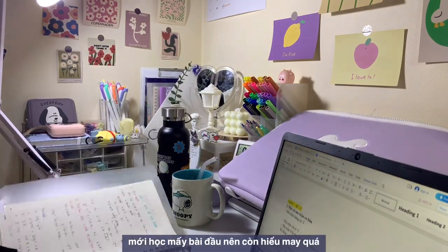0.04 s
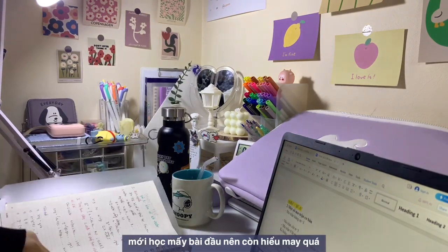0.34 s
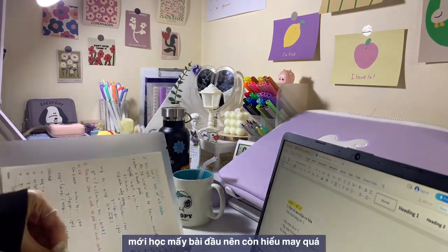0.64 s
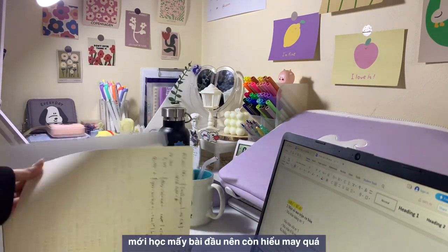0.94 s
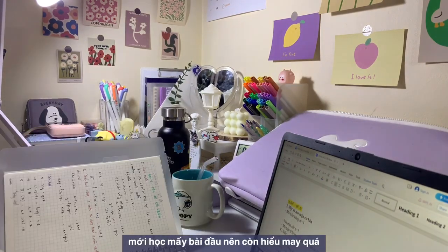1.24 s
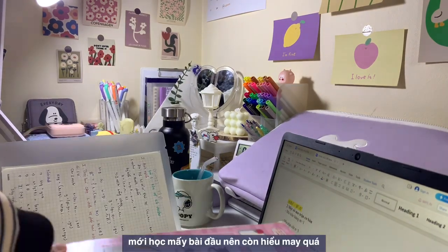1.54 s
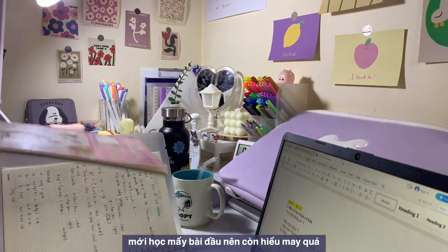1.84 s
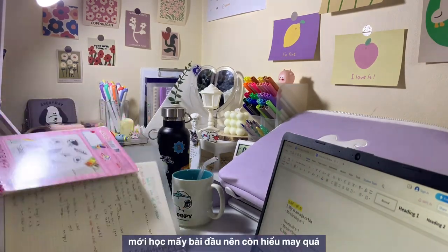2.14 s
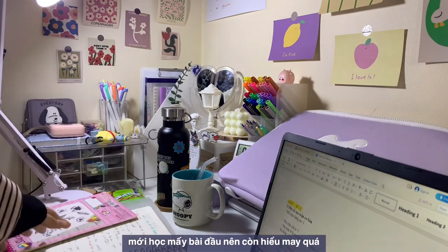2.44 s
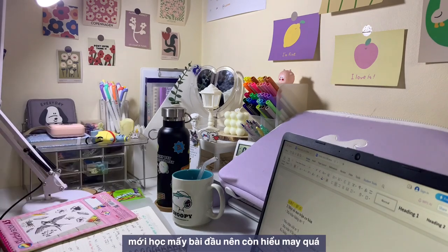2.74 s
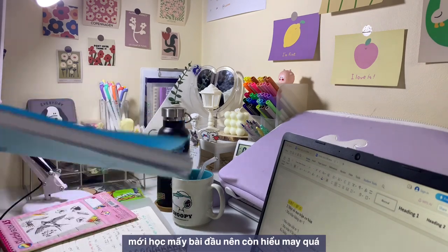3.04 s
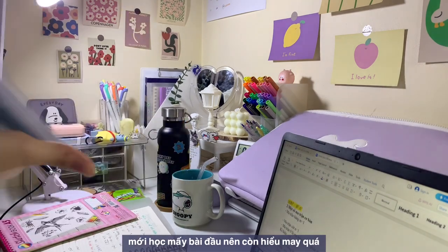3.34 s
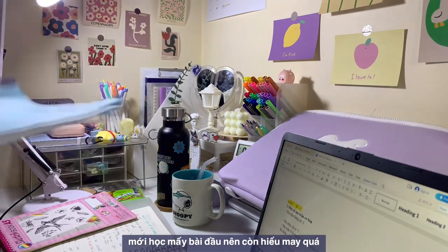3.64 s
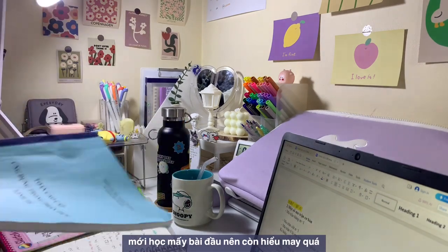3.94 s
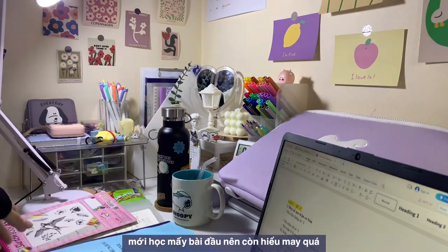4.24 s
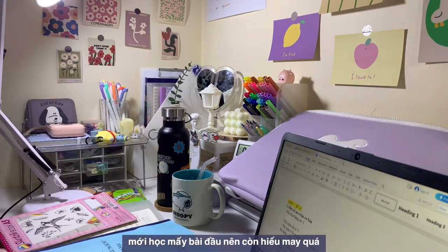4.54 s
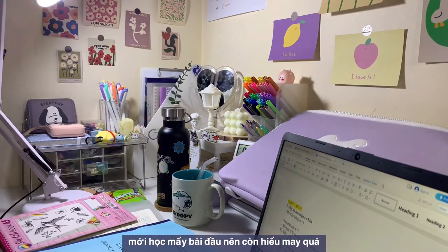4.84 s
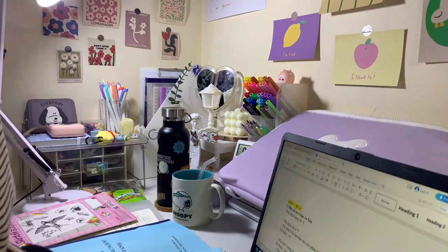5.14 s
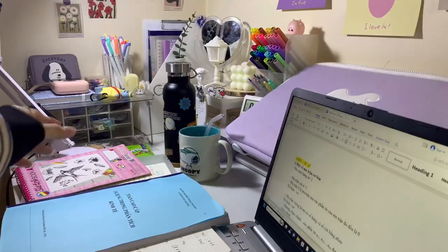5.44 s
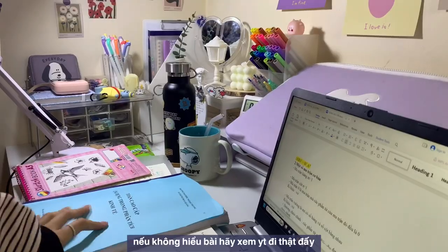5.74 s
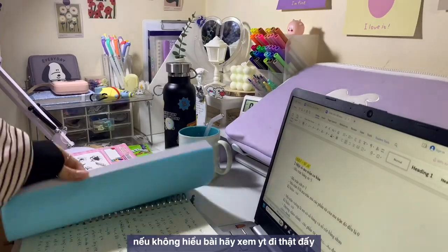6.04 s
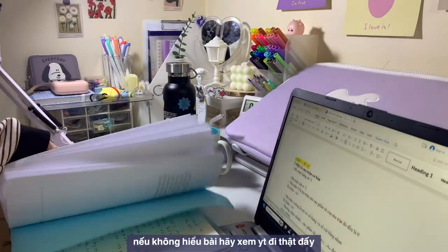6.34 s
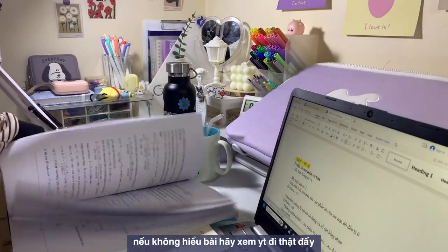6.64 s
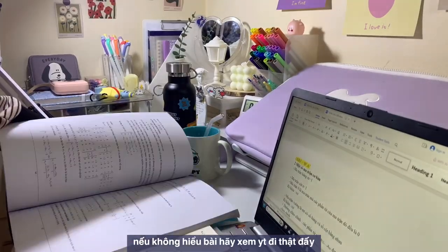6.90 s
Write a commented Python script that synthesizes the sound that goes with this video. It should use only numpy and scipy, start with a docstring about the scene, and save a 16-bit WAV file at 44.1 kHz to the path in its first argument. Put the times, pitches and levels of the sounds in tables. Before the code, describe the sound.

Paper rustles and slides, and books are set down on a desk with slaps and knocks, close by in a small room.

```python
"""Books drop on a pile on a desk, close to a phone: each impact drives out a slap of air and excites
the damped modes of the pile and the desk top. A page is turned, a hand lands on a cover, and stiff
pages buckle and snap as a workbook opens. In between, paper, sleeves and covers slide with the noise
of friction. The small room reverberates, over a low hum."""
import sys
import numpy as np
from scipy import signal
from scipy.fft import rfft, irfft, next_fast_len
from scipy.io import wavfile
from scipy.ndimage import uniform_filter1d, map_coordinates

SR = 44100
rng = np.random.default_rng(int(sys.argv[2]) if len(sys.argv) > 2 else 0)


def wav_out(sig):
    """Save sig, one row per channel (or a flat mono array), as 16-bit PCM at SR to the path in sys.argv[1]."""
    wavfile.write(sys.argv[1], SR, np.round(np.clip(np.atleast_2d(sig).T, -1, 1) * 32767).astype(np.int16))


N = 307377
LEAD_IN_S = .02  # a burst starts this long before its contact

# spectrum of cracking paper: frequency_hz, level_db
CRACK_SPECTRUM = [(500, -32.5), (1500, -15.5), (2500, 1.5), (4000, 0), (5800, 3.5), (8000, -6.5),
                  (11000, 0.5), (16000, -7.5)]


def amp(db):
    """Decibels to amplitude ratio."""
    return 10 ** (np.asarray(db) / 20)


def unit(x):
    """Normalisation to rms 1."""
    return x / np.sqrt(np.mean(x ** 2) + 1e-20)


def along(points, hz):
    """Interpolation of (frequency_hz, value) points on a logarithmic frequency axis."""
    knots_hz, values = np.transpose(points)
    return np.interp(np.log(hz + 1), np.log(knots_hz + 1), values)


def bell(hz, centre_hz, octaves):
    """A Gaussian peak of height 1 in log frequency."""
    return np.exp(-(np.log2(hz / centre_hz) / octaves) ** 2)


def wobble(rate_hz):
    """Smooth random modulation: a spline through rate_hz knots a second."""
    knots = rng.standard_normal(int(N * rate_hz / SR) + 4)
    return map_coordinates(knots, [np.arange(N) * rate_hz / SR])


def swell(peak_s, rise_s, fall_s, depth_db=19.5, shape=1.63):
    """Amplitude envelope, depth_db down at rise_s before its peak and fall_s after it."""
    t = np.arange(N) / SR - peak_s
    distance = np.abs(t / np.where(t < 0, rise_s, fall_s))
    return amp(-depth_db * np.minimum(distance, 10) ** shape)


def add(track, start_s, sound):
    """Superposition of a sound on a track."""
    start = round(start_s * SR)
    track[..., start:start + sound.shape[-1]] += sound[..., :N - start]


def filtered(x, response):
    """Linear filtering: the spectrum of x times a complex frequency response."""
    n = x.shape[-1]
    size = next_fast_len(n + SR // 10)
    return irfft(rfft(x, size) * response(np.fft.rfftfreq(size, 1 / SR)), size)[..., :n]


def coloured(x, spectrum, size=2048):
    """Minimum-phase filtering: folding the cepstrum makes the response causal."""
    cepstrum = irfft(np.log(amp(along(spectrum, np.fft.rfftfreq(size, 1 / SR)))))
    cepstrum[1:size // 2] *= 2
    cepstrum[size // 2 + 1:] = 0
    impulse_response = irfft(np.exp(rfft(cepstrum)))
    return signal.fftconvolve(x, impulse_response[None], axes=1)[:, :x.shape[1]]


def patchy(x, depth_db, bins=7, frames=16):
    """Spectral modulation: the colour drifts in patches of frequency and time."""
    spectra = signal.stft(x, nperseg=512)[2]
    field = uniform_filter1d(rng.standard_normal(spectra.shape[1:]), bins, 0)
    field = uniform_filter1d(field, frames, 1)
    return signal.istft(spectra * amp(depth_db * unit(field)), nperseg=512)[1][:, :x.shape[1]]


def scattered(pair):
    """Diffuse-field coherence: two independent signals become a stereo pair, alike in the bass."""
    # likeness of left and right: frequency_hz, correlation
    coherence = [(150, 0.94), (400, 0.72), (900, 0.29), (1800, 0.083), (3500, 0.054), (16000, 0.19)]
    angle = lambda hz: np.arccos(np.clip(along(coherence, hz), -1, 1)) / 2
    mid, side = filtered(pair, lambda hz: np.array([np.cos(angle(hz)), np.sin(angle(hz))]))
    return np.array([mid + side, mid - side])


def burst(length_s, spectrum, direct_share, lead_db, linger_db, linger_t60_s, grain_db):
    """Contact transient: a first brush, a pulse of grainy noise, a decay; energy of rms 1 for length_s."""
    t = np.arange(SR // 5) / SR - LEAD_IN_S
    rise = np.maximum(t, 0) / (0.4 * length_s)
    pulse = (rise * np.exp(1 - rise)) ** 2
    shiver = amp(linger_db - 60 * t / linger_t60_s) * (1 - np.exp(-rise * rise))
    brush = amp(lead_db) * np.exp(-np.abs(t) / (.5 * length_s))
    grains = amp(grain_db * unit(uniform_filter1d(rng.standard_normal(len(t)), size=12)))
    direct = np.sqrt(direct_share) * rng.standard_normal(len(t))
    diffuse = np.sqrt(1 - direct_share) * scattered(rng.standard_normal((2, len(t))))
    noise = (direct + diffuse) * (pulse + shiver + brush) * grains
    return unit(coloured(noise, spectrum)) * np.sqrt(length_s * SR / len(t))


def room_hum(drone_hz=226, drone_db=-57.5):
    """Ambient noise: a diffuse rumble, and a faint drone modulated in pitch and level."""
    # rumble of the room: frequency_hz, level_db
    rumble_spectrum = [(20, -18), (40, -22.5), (62, 9), (100, -1.5), (150, 4), (220, -3.5), (400, -10.5),
                       (700, -22.5), (1500, -43), (4000, -38.5), (9000, -39.5), (16000, -45)]
    # its slow rise and fall: time_s, level_db
    rumble_levels = [(0, -53.5), (1.502, -55), (2.8, -53), (3.899, -51.5), (4.8, -61), (5.45, -48),
                     (5.8, -54.5), (6.97, -52)]
    rumble = unit(coloured(scattered(rng.standard_normal((2, N))), rumble_spectrum))
    pitch_hz = drone_hz * (1 + .025 * wobble(2.5) + .012 * wobble(32))
    phase = 2 * np.pi * np.cumsum(pitch_hz) / SR
    drone = (np.sin(phase) + amp(-12) * np.sin(2 * phase)) * amp(drone_db + 4.0 * wobble(8))
    drone *= swell(peak_s=2.83, rise_s=3.8, fall_s=3.76)
    rumble_db = np.interp(np.arange(N) / SR, *np.transpose(rumble_levels)) + wobble(1.1)
    return rumble * amp(rumble_db) + drone


def reverberation(x, early_db=-0.5, early_t60_s=0.051):
    """Early reflections, then a diffuse exponential tail; each third of a second takes new paths."""
    # reverberation time of the room: frequency_hz, t60_s
    decay_times = [(100, 0.87), (400, 0.33), (1500, 0.36), (5000, 0.33), (10000, 0.47), (16000, 0.075)]
    # colour of the reflected sound: frequency_hz, gain_db
    colour = [(120, -10.0), (400, -1), (1200, -0.5), (6000, -1.0), (14000, -5.5)]
    block, predelay = SR // 3, SR // 300
    out = np.zeros((2, N))
    for start in range(0, N, block):
        hz, t, spectra = signal.stft(rng.standard_normal((2, SR // 2)), SR, nperseg=256)
        decay = amp(-60 * t / along(decay_times, hz)[:, None]) + amp(early_db - 60 * t / early_t60_s)
        tail = scattered(signal.istft(spectra * decay, SR, nperseg=256)[1])
        tail = np.pad(tail / np.linalg.norm(tail[0]), ((0, 0), (predelay, 0)))
        add(out, start / SR, signal.fftconvolve(x[:1, start:start + block], tail, axes=1))
    return filtered(out, lambda hz: amp(along(colour, hz)))


def cover_rubbing(slip_rate_hz=140, unevenness=0.85, slip_spread_db=4, slip_decay_s=0.0024):
    """Stick-slip friction: fingers and desk drag on a stiff cover and excite its hollow resonances."""
    # resonances of the held cover: centre_hz, width_hz, gain_db
    resonances = [(870, 400, -0.5), (1226, 81, 9.5)]
    # rubbing movements: peak_s, rise_s, fall_s, level_db
    rubs = [(3.13, 0.16, 0.071, -59), (3.37, 0.18, 0.089, -57.5), (3.651, 0.22, 0.35, -59.5),
            (5.0, 0.12, 0.13, -64.5), (5.258, 0.17, .012, -52.5)]
    gap, size = rng.standard_normal((1500, 2)).T
    onsets = (np.cumsum(np.exp(unevenness * gap)) * SR / slip_rate_hz).astype(int)
    slips = np.bincount(onsets[onsets < N], amp(slip_spread_db * size[onsets < N]), N)
    envelope = signal.lfilter([1], [1, -np.exp(-1 / (slip_decay_s * SR))], slips)
    grit = scattered(envelope * rng.standard_normal((2, N)))
    cover = lambda hz: sum(amp(db) * 1j * hz * width / (centre ** 2 - hz ** 2 + 1j * hz * width)
                           for centre, width, db in resonances)
    sound = unit(filtered(grit, lambda hz: cover(hz) / (1 + (hz / 2200) ** 4)))
    return sound * sum(amp(db) * swell(*timing) for *timing, db in rubs)


def stroke_levels(rest_scrape_db=-75.5, rest_hiss_db=-78):
    """Incoherent sources add in power: scrape level, hiss level and power-weighted brightness, in dB."""
    # slides of paper and sleeves: peak_s, rise_s, fall_s, scrape_db, hiss_db, brightness_db
    strokes = [(0.005, .02, .08, -64, -49, 0), (0.231, 0.1, 0.12, -71, -57.5, -7.5),
               (.39, 0.09, 0.042, -60, -46, 3), (.565, .13, 0.079, -52.5, -47, -1),
               (.655, 0.034, .14, -60.5, -50, 1.5), (0.827, .06, 0.052, -49, -40.5, 0.5),
               (.903, 0.09, .13, -36.5, -42.5, 1), (1.055, 0.063, 0.058, -40, -43.5, -7),
               (1.309, 0.091, 0.069, -55, -54.5, -4), (1.53, 0.07, 0.048, -96, -66, 12.5),
               (1.68, 0.12, 0.3, -64.5, -65, 3.5), (2.35, .2, 0.11, -39.5, -47, -6.5),
               (2.611, 0.091, 0.2, -52.5, -53, -8), (2.73, 0.14, 0.22, -59, -52.5, -2),
               (3.06, 0.2, 0.18, -61, -59.5, 1.5), (3.32, 0.49, 0.34, -58, -53.5, 6),
               (3.55, 0.15, 0.18, -58.5, -55, 2), (3.719, .12, 0.19, -58, -54.5, 5.5),
               (3.97, 0.094, 0.083, -60.5, -53.5, 5), (4.5, 0.12, 0.14, -65, -61, 8),
               (4.88, 0.32, 0.28, -69, -62, 4.5), (5.255, 0.21, 0.0063, -52.5, -50, 2),
               (5.519, 0.13, .26, -85, -55, 7.5), (5.85, 0.24, 0.15, -51, -60, 2.5),
               (5.907, 0.026, .04, -46, -37.5, 11), (5.95, 0.11, 0.35, -48, -53.5, 5),
               (6.222, 0.059, 0.063, -50.5, -44, -4.5), (6.325, 0.038, 0.04, -59, -46.5, 2.5),
               (6.44, 0.17, 0.48, -42.5, -47, -4), (6.66, 0.092, .21, -45.5, -44, -11.5)]
    peak_s, rise_s, fall_s, scrape_db, hiss_db, bright_db = np.transpose(strokes)
    power = np.array([swell(*timing) for timing in zip(peak_s, rise_s, fall_s)]) ** 2
    scrape = amp(scrape_db) ** 2 @ power + amp(rest_scrape_db) ** 2
    hiss = amp(hiss_db) ** 2 @ power + amp(rest_hiss_db) ** 2
    brightness_db = (bright_db * amp(hiss_db) ** 2) @ power / hiss
    return 10 * np.log10(scrape), 10 * np.log10(hiss), brightness_db


def friction(spectrum, grain_db, grain_rate_hz, patchy_db):
    """Friction noise: fibres catch and slip in uneven grains, coloured by the flexing sheet."""
    grains = amp(grain_db * wobble(grain_rate_hz)) * rng.standard_normal((2, N))
    return unit(patchy(coloured(scattered(grains), spectrum), patchy_db))


def crackle(rate_hz, spread_db):
    """Shot noise: tiny creases give way at random moments, most of them faintly; rms 1."""
    when, size = rng.random((int(rate_hz * N / SR), 2)).T
    ticks = np.bincount((when * N).astype(int), amp(spread_db * size ** 3), N)
    crease = rng.standard_normal((2, 128)) * amp(-60 * np.arange(128) / 128)
    creases = signal.fftconvolve(ticks[None], crease, axes=1)[:, :N]
    return unit(coloured(creases, CRACK_SPECTRUM))


def paper_sliding(treble_hz=6000):
    """Sliding friction: sheets scrape and hiss under an unsteady hand, and crackle as they flex."""
    # low scrape of the sheets: frequency_hz, level_db
    scrape_spectrum = [(50, -34.5), (110, 4.5), (280, 3.5), (480, 1), (620, 0), (860, 1), (1020, 0.5),
                       (1250, -1), (1600, -4), (2200, -9), (3500, -12), (8000, -64.5)]
    # high hiss of the sheets: frequency_hz, level_db
    hiss_spectrum = [(600, -41.5), (1900, -1.5), (2700, -0.5), (3600, 0.5), (4200, -0.5), (6000, -1),
                     (8500, -4), (11500, -3.5), (15500, -4.5)]
    scrape_db, hiss_db, bright_db = stroke_levels()
    hand_db = 1.1 * wobble(35)
    scrape = friction(scrape_spectrum, grain_db=3, grain_rate_hz=150, patchy_db=3.5)
    creases = crackle(rate_hz=100, spread_db=15) * amp(scrape_db - 16)
    hiss = friction(hiss_spectrum, grain_db=-1.5, grain_rate_hz=1200, patchy_db=2.5)
    treble = filtered(hiss, lambda hz: hz ** 4 / (hz ** 4 + treble_hz ** 4))
    hiss = (hiss - treble + amp(bright_db) * treble) / np.sqrt((1 + amp(bright_db) ** 2) / 2)
    return scrape * amp(scrape_db + hand_db) + creases + hiss * amp(hiss_db + hand_db)


def page_snaps(bend_delay_s=.0006, edge_db=7, edge_octaves=0.19):
    """Buckling: a sheet cracks at the pitch of its edge; a slower bending wave follows as a pop."""
    # edges that flick, buckle or touch down: start_s, length_s, crack_db, pop_db, pop_hz, edge_hz
    snaps = [(.216, .014, -36.5, -50, 2270, 3730), (0.321, 0.017, -60, -52, 490, 11400),
             (0.587, 0.0026, -44, -45, 1510, 11600), (.839, .003, -38, -38.5, 1210, 14800),
             (0.885, .006, -37, -30.5, 597, 2980), (0.9083, 0.0076, -36, -33, 880, 11500),
             (0.964, 0.01, -41.5, -34, 570, 5000), (.992, .004, -42.5, -34.5, 793, 3000),
             (1.038, 0.0047, -37.5, -36.5, 920, 11600), (1.064, .0082, -44, -33, 560, 11600),
             (1.2805, 0.0031, -33.5, -33.5, 1070, 3100), (1.354, .004, -46, -41.5, 1380, 7200),
             (1.387, 0.004, -48, -50, 1510, 5000), (1.767, 0.0039, -52, -55, 1650, 3920),
             (2.115, .0044, -42, -31.5, 1050, 3000), (2.129, 0.0038, -31, -27.5, 810, 2880),
             (2.2263, 0.0055, -33.5, -26.5, 710, 5950), (2.258, 0.0033, -30, -31, 1400, 7100),
             (2.286, 0.0031, -37, -26.5, 1030, 3000), (2.328, 0.0076, -27.5, -28.5, 634, 3000),
             (2.348, 0.0046, -16, -12, 714, 5900), (3.121, 0.0081, -58, -46.5, 860, 3000),
             (3.7, 0.0029, -44, -40, 960, 3030), (4.059, 0.0058, -68, -51, 1250, 3000),
             (4.1822, 0.0037, -25, -14, 980, 11500), (4.187, 0.0053, -29.5, -17, 610, 3000),
             (4.336, .007, -39, -41.5, 1210, 3900), (4.356, 0.007, -48, -40, 1090, 5930),
             (4.538, 0.0027, -42, -40.5, 1730, 8900), (4.953, .0043, -51.5, -52, 1740, 2970),
             (5.019, 0.025, -77, -56.5, 906, 9000), (5.118, 0.0078, -48, -50, 797, 9270),
             (5.6358, .007, -28.5, -22.5, 1050, 3030), (5.808, 0.0067, -54, -39, 580, 3000),
             (6.0292, .0035, -58, -36, 1640, 3080), (6.104, 0.0032, -44, -43, 1100, 11500),
             (6.357, 0.0028, -36.5, -38, 1440, 14560), (6.418, 0.0066, -37, -29.5, 1080, 2970),
             (6.451, 0.0072, -50, -35.5, 1750, 3020), (6.5321, 0.002, -16, -19.5, 1240, 8300),
             (6.611, .0033, -14, -22, 2260, 8500), (6.6982, .0022, -15.5, -18, 1710, 7200),
             (6.812, 0.0064, -36, -34.5, 960, 4000), (6.904, 0.003, -60, -37, 755, 3000)]
    # spectrum of the pop: multiple_of_pitch, level_db
    pop_shape = [(.1, -27.5), (.3, -3.5), (.6, -3.5), (1, -2), (1.5, -9), (2.4, -13), (4, -29), (9, -45.5)]
    out = np.zeros((2, N))
    hz = np.geomspace(400, 16000, 64)
    for start_s, length_s, crack_db, pop_db, pop_hz, edge_hz in snaps:
        edge_spectrum = np.c_[hz, along(CRACK_SPECTRUM, hz) + edge_db * bell(hz, edge_hz, edge_octaves)]
        pop_spectrum = [(multiple * pop_hz, db) for multiple, db in pop_shape]
        crack = burst(length_s, edge_spectrum, direct_share=0.45, lead_db=-15,
                      linger_db=-20, linger_t60_s=0.041, grain_db=3.5)
        pop = burst(length_s, pop_spectrum, direct_share=0.94, lead_db=-15,
                    linger_db=-17, linger_t60_s=.04, grain_db=1.5)
        add(out, start_s - LEAD_IN_S, amp(crack_db) * crack)
        add(out, start_s - LEAD_IN_S + bend_delay_s, amp(pop_db) * pop)
    return out


def ring(modes, attack_s, scatter_db):
    """Free vibration: damped modes at new strengths for each blow, rms 1 over the first 50 ms."""
    t = np.arange(SR) / SR
    hz, db, t60_s = np.transpose(modes)[:, :, None]
    struck_db = db + scatter_db * rng.standard_normal(hz.shape)
    tones = amp(struck_db - 60 * t / t60_s) * np.sin(2 * np.pi * hz * t)
    sound = tones.sum(0) * (1 - np.exp(-t / attack_s))
    return sound / sound[:SR // 20].std()


def book_impacts(favour_db=7, favour_octaves=0.09):
    """Impact excitation: air slaps out from under a landing book; the pile knocks, the desk top booms."""
    # pages, books and hands landing: start_s, contact_s, desk_db, boom_hz, pile_db, slap_db
    impacts = [(.882, .02, -40.5, 138, -43.5, -39.5), (.992, .01, -36, 99, -45, -44.5),
               (1.049, 0.02, -55.5, 150, -59, -43), (1.286, .013, -41.5, 115, -51.5, -55),
               (2.126, 0.008, -36, 149.7, -46.5, -33), (2.23, .0078, -35.5, 102, -55.5, -34),
               (2.335, .012, -40, 105.5, -35.5, -31), (2.349, .0087, -30.5, 136.7, -19.5, -18.5),
               (4.17, 0.03, -35.5, 205, -43.5, -24.5), (4.191, 0.0055, -34, 228.7, -18, -11.5),
               (4.202, 0.006, -18.5, 133, -33, -14.5), (4.228, .043, -27, 141.5, -40.5, -30),
               (5.64, .021, -30, 134.4, -46, -32.5), (5.814, .0088, -53.5, 102, -49.5, -52.5),
               (5.858, .01, -42.5, 146, -47, -42), (6.391, 0.036, -38, 108.4, -72, -48),
               (6.494, .023, -45, 123, -68, -52), (6.611, .011, -43.5, 139, -50, -36),
               (6.702, 0.0066, -53, 150, -69, -36.5)]
    # modes of the desk top: pitch_hz, level_db, t60_s
    desk_modes = [(65.7, -33.5, 0.4), (99, -9, 0.65), (120, -6, .18), (124.8, -3, 0.11), (133.1, -1, 0.23),
                  (146.75, -13, 0.55), (154.1, -7.5, .42), (188.8, -9, 0.08), (208.6, -6.5, 0.35),
                  (226.7, -8.5, .22), (261.5, -16, 0.2), (278, -19, 0.33)]
    # modes of the pile of books: pitch_hz, level_db, t60_s
    pile_modes = [(377, -17, 0.04), (406, 6.5, 0.13), (427, 1.5, 0.1), (463, -3, 0.15), (532.5, -0.5, 0.1),
                  (605, -18.5, 0.054), (677, -8.5, 0.12), (785, -19, 0.26), (825, -4, 0.13),
                  (871, -21, 0.2), (1030, -23, 0.1), (1280, -15.5, 0.14), (1420, -15.5, .13)]
    # expelled air: frequency_hz, level_db
    slap_spectrum = [(80, -32), (200, -1), (430, -9), (620, -1), (800, -1.5), (1050, -1.5), (1600, -11.5),
                     (3000, -15), (6000, -21.5), (10000, -27), (16000, -29.5)]
    out = np.zeros((2, N))
    for start_s, contact_s, desk_db, boom_hz, pile_db, slap_db in impacts:
        # the spot that is struck favours the desk modes near one pitch
        struck_modes = [(hz, db + favour_db * bell(hz, boom_hz, favour_octaves), t60_s)
                        for hz, db, t60_s in desk_modes]
        slap = burst(contact_s, slap_spectrum, direct_share=0.33, lead_db=-26,
                     linger_db=-6.5, linger_t60_s=0.096, grain_db=1.5)
        add(out, start_s - LEAD_IN_S, amp(slap_db) * slap)
        add(out, start_s, amp(pile_db) * ring(pile_modes, attack_s=0.0024, scatter_db=1.0))
        add(out, start_s, amp(desk_db) * ring(struck_modes, attack_s=0.012, scatter_db=4.0))
    return out


def scene(left_lead_s=0.00013):
    """Direct sound, reverberation and hum; the books lie to the left, so their sound arrives there first."""
    books = paper_sliding() + cover_rubbing() + page_snaps() + book_impacts()
    advance_s = left_lead_s * np.array([[.5], [-.5]])
    direct = filtered(books, lambda hz: np.exp(2j * np.pi * hz * advance_s))
    return direct + amp(-7.5) * reverberation(books) + room_hum()


def record(dry, low_cut_hz=45, top_hz=16300):
    """Transducer response: the phone's ports differ in colour; it sheds deep bass, clips and band-limits."""
    # imbalance of the ports: frequency_hz, left_minus_right_db
    imbalance = [(60, 1.8), (130, -2.5), (260, -0.3), (1000, 2.5), (2300, 3), (4500, 2.5), (8000, -0.5),
                 (13000, -1)]
    port_gain = lambda hz: amp(along(imbalance, hz) * np.array([[.5], [-.5]]))
    ports = filtered(dry, lambda hz: port_gain(hz) * 1j * hz / (low_cut_hz + 1j * hz))
    return filtered(np.clip(ports, -1, 1), lambda hz: hz < top_hz)


dry = scene()
out = record(dry)
wav_out(out)
```